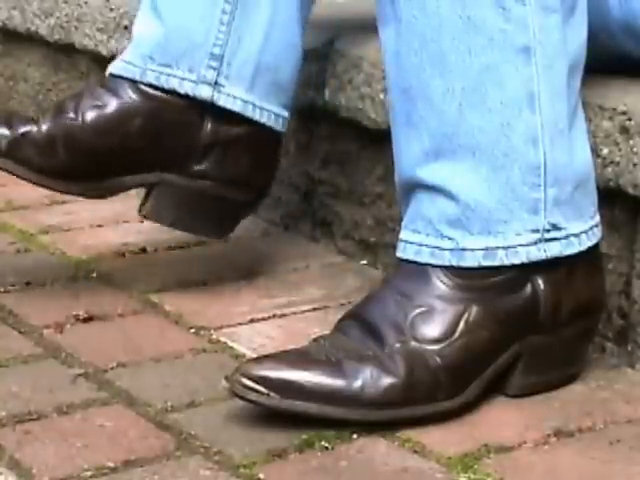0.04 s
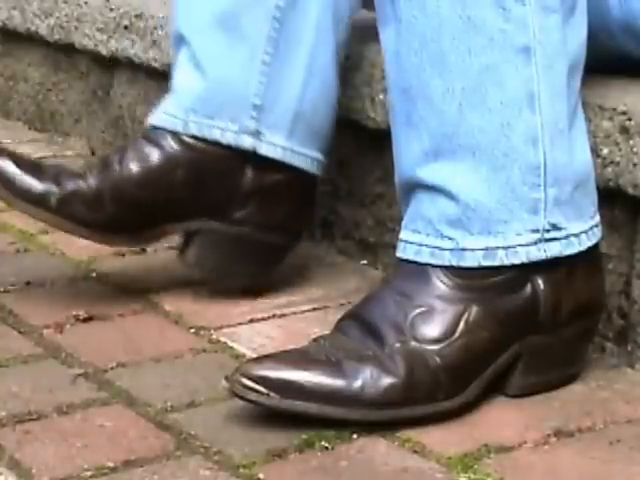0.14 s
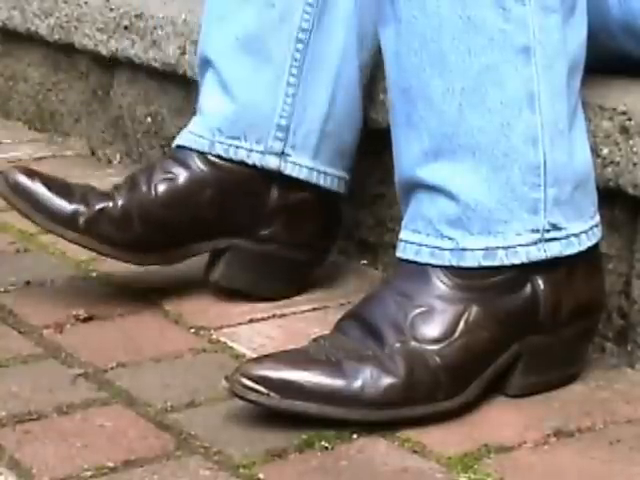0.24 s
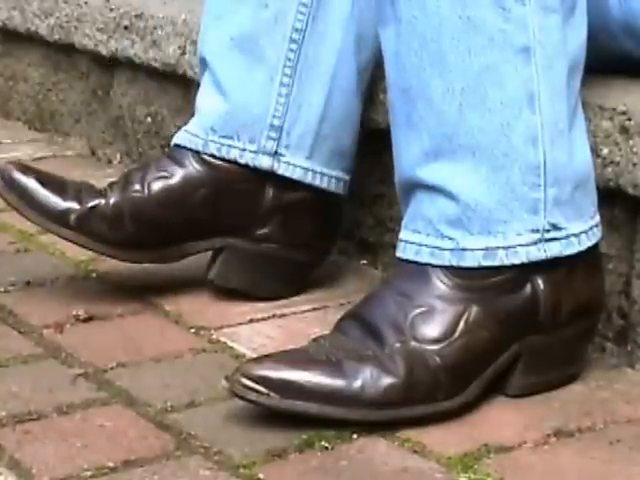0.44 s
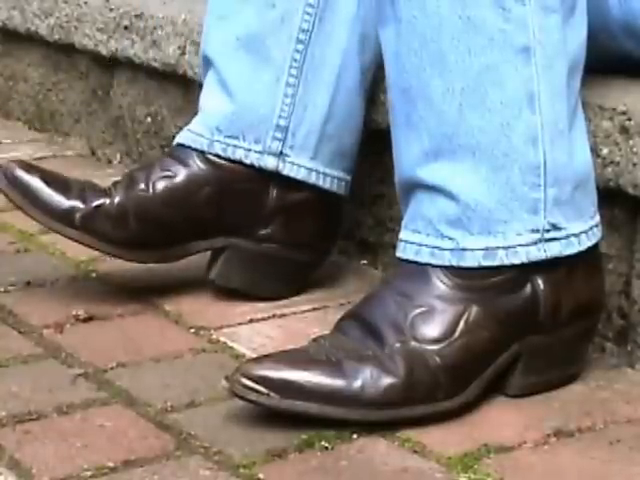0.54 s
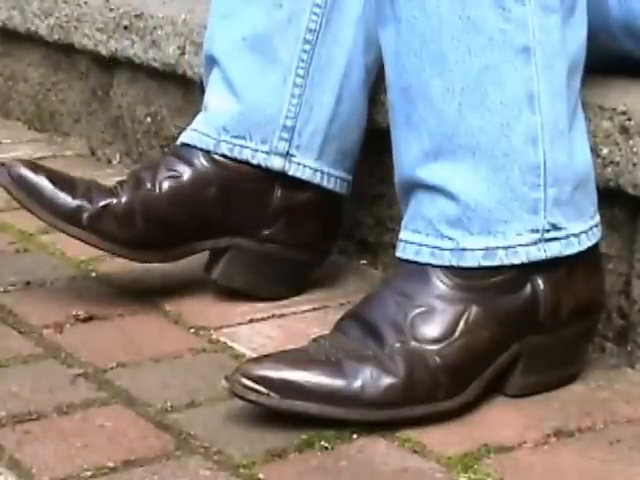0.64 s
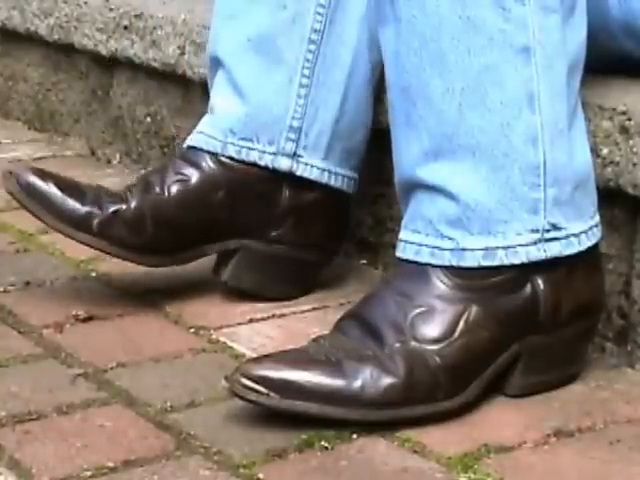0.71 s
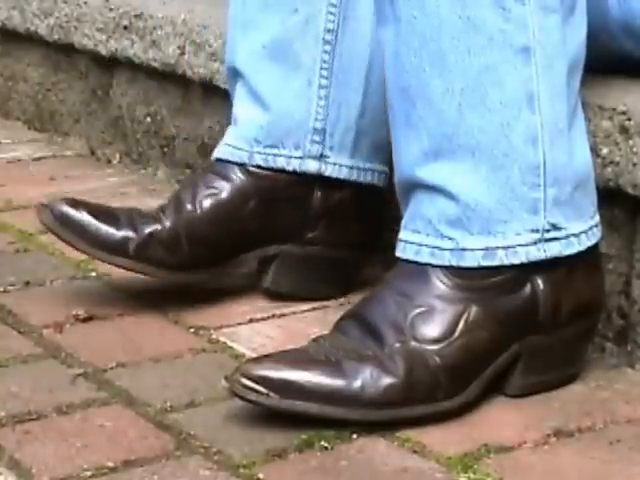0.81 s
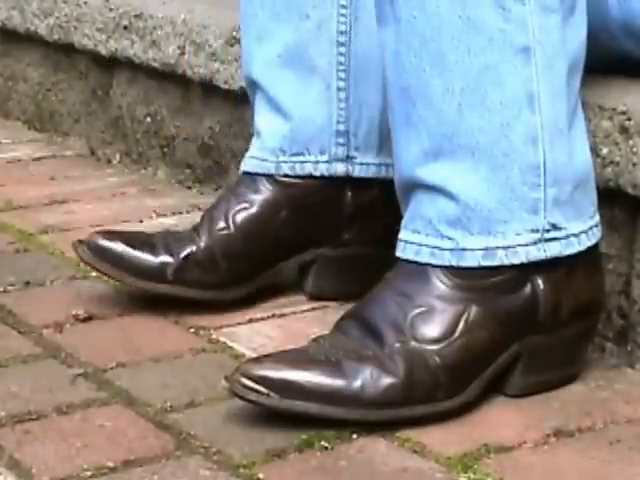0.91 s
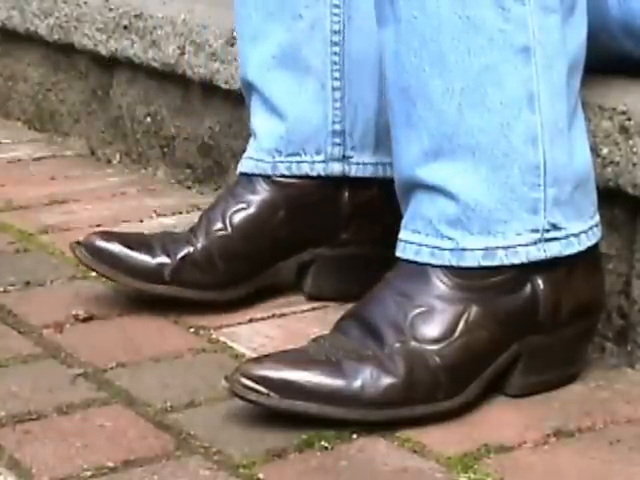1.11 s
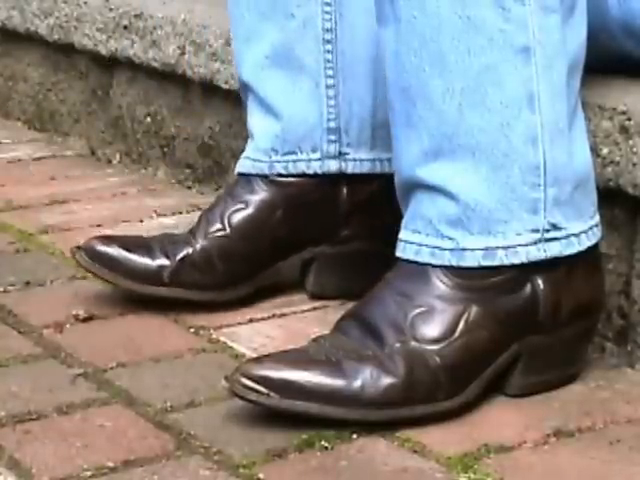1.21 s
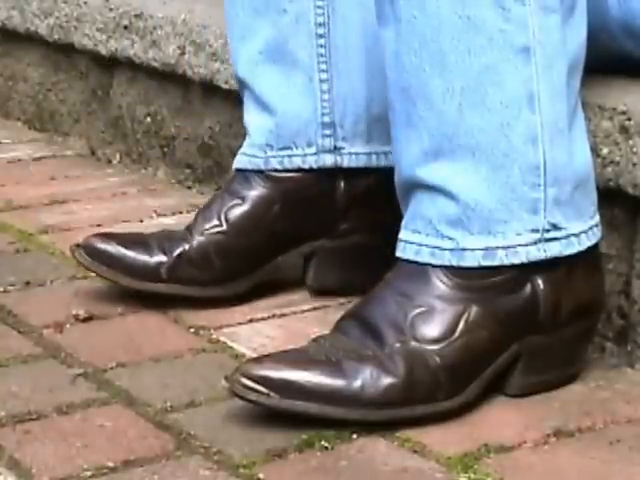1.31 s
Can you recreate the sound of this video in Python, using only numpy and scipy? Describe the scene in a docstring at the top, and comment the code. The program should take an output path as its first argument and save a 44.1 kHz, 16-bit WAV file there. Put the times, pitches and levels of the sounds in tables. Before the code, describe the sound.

A boot heel stomps once on brick paving, close to the microphone, with a brief echo off nearby walls. The sole then drags softly over grit and settles with faint bumps, against quiet outdoor background noise.

```python
"""A quiet outdoor wash and a low breeze run throughout.
At 0.2 s a boot heel stomps once on brick paving, close by; nearby walls throw the knock back.
A limiter ducks at the stomp and creeps back.
From 0.7 s the boot is dragged back: grit crackles and the sole judders.
From 1.1 s the foot settles in three soft bumps."""
import sys
import numpy as np
from scipy import signal
from scipy.fft import rfft, irfft, next_fast_len
from scipy.io import wavfile
from scipy.ndimage import uniform_filter1d, minimum_filter1d

SR = 44100
rng = np.random.default_rng(int(sys.argv[2]) if len(sys.argv) > 2 else 0)


def output_pcm(signal):
    """Save a mono or channel-first signal as 16-bit PCM at the path in sys.argv[1].

    Samples are clipped to [-1, 1] before scaling.
    """
    pcm = np.clip(np.atleast_2d(signal).T, -1, 1) * 32767
    wavfile.write(sys.argv[1], SR, np.round(pcm).astype(np.int16))


N = 59535
TIME_S = np.arange(N) / SR
FFT_SIZE = next_fast_len(2 * N)
FREQ_HZ = np.fft.rfftfreq(FFT_SIZE, 1 / SR)

# far and near sounds (frequency [Hz], L-R correlation [0-1])
FAR_COHERENCE = [(100, 0.94), (250, 0.87), (500, 0.57), (1000, 0.49), (2000, 0.46), (4000, .7),
                 (8000, 0.57), (14000, 1)]
NEAR_COHERENCE = [(100, 0.98), (250, .98), (600, 0.36), (2000, 0.9), (8000, 1), (14000, 0.99)]
# background noise (frequency [Hz], level [dB])
WASH_SPECTRUM = [(10, -30), (35, -6), (60, -1), (160, 0), (260, -3), (600, -3), (1400, -3.7), (2000, -7.5),
                 (3100, -10.7), (4400, -18.3), (5800, -22), (7000, -26.5), (10000, -30), (16000, -31)]
BREEZE_SPECTRUM = [(10, -35), (24, -19), (36, 4), (75, 0), (145, -2.5), (220, -20.5), (500, -35),
                   (3000, -79)]
# breeze strength (time [s], level [dB])
GUSTS = [(0, -38), (.15, -40), (.35, -35.5), (.62, -40.5), (.8, -36.5), (.95, -36.5), (1.04, -40),
         (1.11, -37.5), (1.21, -34), (1.27, -45), (1.35, -36)]

# boot bumps (time [s], thud level [dB], tick level [dB])
BUMPS = [(.733, -21.5, -60), (.761, -29, -60), (.882, -18.5, -60), (.928, -28.5, -48), (1.139, -28, -34),
         (1.205, -23, -50), (1.2745, -30.5, -20.5)]
# stick-slip of the sole (time [s], slip rate [Hz], level [dB])
JUDDER = [(0.782, 255, -35), (0.799, 290, -35), (0.817, 300, -29), (.84, 298, -31.5), (0.862, 230, -50)]
# dragged sole (time [s], rub level [dB], scrape level [dB], grit level [dB])
DRAG_LEVELS = [(.69, -68, -83, -61), (.74, -31, -46, -53.5), (.785, -50, -50, -47.5), (.82, -36, -41, -47),
               (.86, -28.5, -36, -38), (.91, -28, -34, -39.5), (.94, -29, -43, -53), (.98, -46, -64, -74)]
# single grains snapping (time [s], level [dB], T60 [s])
SNAPS = [(.368, -48, 0.082), (.702, -38, 0.014), (.7455, -48, .025), (.7585, -41, .008),
         (.7988, -32.5, .008), (.8097, -22.5, 0.0084), (.8195, -32.5, .012), (.826, -28.5, .016),
         (.8625, -33, .012), (.9045, -25.5, .016), (.912, -27.5, 0.0067)]
# grit crushed by the heel (delay [s], level [dB])
CRACKS = [(0, -30.5), (.0028, -36.5), (.0053, -33)]
# contact noises (frequency [Hz], level [dB])
TICK_SPECTRUM = [(300, 15), (2200, 0), (4200, -2.5), (5500, -18.5), (16000, -53)]
RUB_SPECTRUM = [(30, -30), (90, -3), (150, 2), (230, -3), (430, -7), (600, -16), (1200, -24.5), (3000, -55),
                (9000, -80)]
SCRAPE_SPECTRUM = [(300, -10), (700, 1.5), (1400, -12), (1630, 7.5), (1850, -7.5), (2500, -7), (3550, -1),
                   (4700, -14.5), (9000, -20), (16000, -47)]
GRIT_SPECTRUM = [(1500, -14), (4800, 0), (5600, 10.5), (6100, 0), (6500, 8), (7200, -2), (8300, 4.5),
                 (9200, 6.5), (10200, -2), (11000, -3), (12700, -9), (14000, -6), (16000, -5)]
SNAP_SPECTRUM = [(1500, -23), (4000, 2), (7000, -3), (8500, 4), (10200, -2.5), (12000, -6), (16000, -20)]
CRACK_SPECTRUM = [(500, -6), (2800, 5), (4000, -1), (5300, 1.5), (7000, -12.5), (11000, -11.5),
                  (16000, -23)]
# boot resonances (frequency [Hz], level [dB], T60 [s])
SOLE_MODES = [(110, -4, .05), (195, 0, .06), (397, -5, .035)]
HEEL_MODES = [(178.3, -3, 0.056), (409.4, 3.5, 0.019), (473, 10.5, 0.0054), (485, -11, 0.039),
              (1103, 1.97, 0.0064), (1857, -24.5, 0.03), (2800, -25, 0.013)]

# early reflections (delay [s], level [dB], L-R level [dB])
ECHOES = [(.0093, -14, 10), (0.0151, -16, 7), (.0325, -21, 5), (0.0476, -27, 15)]
# diffuse reverberation (frequency [Hz], level [dB], T60 [s])
TAIL_BANDS = [(30, -22, .3), (79, -5, 0.51), (160, 3, 0.16), (258, -3, 0.43), (500, -6, 0.31),
              (800, -1.5, 0.35), (1160, -17, 0.47), (1760, -33.5, 1), (4100, -42, 1), (9000, -64, 0.33)]
# microphone pair balance, and the heel's extra share (frequency [Hz], L-R level [dB])
MIC_BALANCE = [(40, 4), (120, 4), (200, 7), (380, 1), (700, 1), (1300, -1), (2400, -1.5), (4400, -0.8),
               (9000, 0)]
HEEL_BALANCE = [(150, 2), (400, .3), (1000, 0)]
# heel arrival at the pair (frequency [Hz], L-R phase [rad])
HEEL_PHASE = [(60, -0.28), (200, -0.69), (420, -.95), (800, -0.98), (1300, -0.58), (2300, -0.95), (3600, 0)]

STOMP_S = .2154


def amp(db):
    """Decibels to gain."""
    return 10 ** (np.asarray(db) / 20)


def unit_rms(x):
    """Scales to rms 1."""
    return x / np.sqrt(np.mean(x ** 2) + 1e-20)


def curve(table, hz=FREQ_HZ, column=1):
    """Interpolates a table over log frequency."""
    columns = np.transpose(table)
    return np.interp(np.log(hz + 1), np.log(columns[0] + 1), columns[column])


def envelope(table, column=1):
    """Gain over time from a dB table; silent outside it."""
    columns = np.transpose(table)
    return amp(np.interp(TIME_S, columns[0], columns[column], left=-np.inf, right=-np.inf))


def filtered(x, response):
    """Applies a frequency response."""
    return irfft(rfft(x, FFT_SIZE) * response, FFT_SIZE)[..., :N]


def pan(db):
    """Left and right gains for an L-R level."""
    return amp(np.array([np.atleast_1d(db), -np.atleast_1d(db)]) / 2)


def decay(start_s, t60_s):
    """Sudden onset, exponential fall."""
    return (TIME_S >= start_s) * np.exp(-np.log(1000) * np.maximum(TIME_S - start_s, 0) / t60_s)


def stereo(a, b, spectrum, coherence):
    """Two independent signals to a coloured, partly coherent pair, rms 1."""
    correlation = np.clip(curve(coherence), -1, 1)
    gain = amp(curve(spectrum))
    mid = filtered(a, gain * np.sqrt(1 + correlation))
    side = filtered(b, gain * np.sqrt(1 - correlation))
    return unit_rms(np.array([mid + side, mid - side]))


def noise(spectrum, coherence=NEAR_COHERENCE):
    """Coloured stereo noise, rms 1."""
    return stereo(*rng.standard_normal((2, N)), spectrum, coherence)


def drift(samples):
    """Smoothed noise, rms 1."""
    return unit_rms(uniform_filter1d(rng.standard_normal(N), size=samples))


def ring(modes, start_s, swell_cycles=.82):
    """Damped modes, each swelling as the contact builds."""
    age_s = np.maximum(TIME_S - start_s, 0)
    total = np.zeros(N)
    for hz, db, t60_s in modes:
        swell = 1 - np.exp(-age_s * hz / swell_cycles)
        total += amp(db) * decay(start_s, t60_s) * swell * np.sin(2 * np.pi * hz * age_s)
    return total


def wash(level_db=-36.5, patch_db=.68):
    """Distant outdoor noise with faint drifting patches."""
    bands = signal.stft(noise(WASH_SPECTRUM, FAR_COHERENCE), nperseg=512)[2]
    patches = uniform_filter1d(rng.standard_normal(bands.shape[1:]), size=8, axis=0)
    patches = unit_rms(uniform_filter1d(patches, size=8, axis=1))
    return amp(level_db) * signal.istft(bands * amp(patch_db * patches), nperseg=512)[1][:, :N]


def breeze():
    """Gusts rumble on the microphones."""
    return noise(BREEZE_SPECTRUM) * envelope(GUSTS)


def bumps(tick_t60_s=.012):
    """The boot catches on the paving and settles: soft thuds, each with a tick."""
    tick = noise(TICK_SPECTRUM)
    return sum(amp(thud_db) * ring(SOLE_MODES, start_s) + amp(tick_db) * tick * decay(start_s, tick_t60_s)
               for start_s, thud_db, tick_db in BUMPS)


def judder(rate_jitter=.041, overtone_db=-18):
    """The sole briefly sticks and slips at a nearly even rate."""
    times_s, rates_hz, _ = np.transpose(JUDDER)
    slip_hz = np.interp(TIME_S, times_s, rates_hz) * (1 + rate_jitter * drift(samples=200))
    phase = 2 * np.pi * np.cumsum(slip_hz) / SR
    return envelope(JUDDER, column=2) * unit_rms(np.sin(phase) + amp(overtone_db) * np.sin(2 * phase))


def grains(spectrum, clicks_per_s=3700, spread_db=4.5, clump_db=1):
    """Rolling grit: dense, uneven clicks in clumps."""
    clumps_db = clump_db * drift(samples=180)
    sizes = amp(spread_db * np.minimum(rng.exponential(1, (2, N)), 4) + clumps_db)
    clicks = sizes * rng.choice([-1, 1], (2, N)) * (rng.random(N) < clicks_per_s / SR)
    return stereo(*clicks, spectrum, NEAR_COHERENCE)


def scuff():
    """The sole rubs over brick and rolls grit; a few grains snap."""
    rub = noise(RUB_SPECTRUM) * envelope(DRAG_LEVELS)
    scrape = grains(SCRAPE_SPECTRUM) * envelope(DRAG_LEVELS, column=2)
    grit = grains(GRIT_SPECTRUM) * envelope(DRAG_LEVELS, column=3)
    snaps = noise(SNAP_SPECTRUM) * sum(amp(db) * decay(start_s, t60_s) for start_s, db, t60_s in SNAPS)
    return rub + scrape + grit + snaps


def wall_echoes(knock, cutoff_hz=1160):
    """Nearby walls return dull, delayed copies of the knock."""
    lowpass = 1 / (1 + (FREQ_HZ / cutoff_hz) ** 4)
    paths = sum(amp(db) * pan(side_db) * np.exp(-2j * np.pi * FREQ_HZ * delay_s)
                for delay_s, db, side_db in ECHOES)
    return filtered(knock, lowpass * paths)


def diffuse_tail(gain_db=-21.5, delay_s=.008, rise_s=.025):
    """The stomp's reverberation: noise that dies band by band."""
    hz, frames_s, bands = signal.stft(noise(TAIL_BANDS, FAR_COHERENCE), SR, nperseg=512)
    t60_s = curve(TAIL_BANDS, hz, column=2)[:, None]
    fall = amp(-60 * np.maximum(frames_s - STOMP_S, 0) / t60_s)
    rise = 1 - np.exp(-np.maximum(TIME_S - STOMP_S - delay_s, 0) / rise_s)
    return amp(gain_db) * rise * signal.istft(bands * fall, SR, nperseg=512)[1][:, :N]


def stomp(gain_db=7, low_cut_hz=81, crack_t60_s=.009):
    """The heel, too small to radiate deep bass, knocks on brick and crushes grit; the walls answer."""
    highpass = (1j * FREQ_HZ / (1j * FREQ_HZ + low_cut_hz)) ** 2
    knock = filtered(ring(HEEL_MODES, STOMP_S), highpass)
    phase_split = np.exp(.5j * np.array([[1], [-1]]) * curve(HEEL_PHASE))
    direct = filtered(knock, pan(curve(HEEL_BALANCE)) * phase_split)
    bursts = sum(amp(db) * decay(STOMP_S + delay_s, crack_t60_s) for delay_s, db in CRACKS)
    crack = noise(CRACK_SPECTRUM) * bursts
    return amp(gain_db) * (direct + crack + wall_echoes(knock) + diffuse_tail())


def scene():
    """All sources at a microphone pair with fuller bass on the left."""
    mix = stomp() + scuff() + judder() + bumps() + wash() + breeze()
    return filtered(mix, pan(curve(MIC_BALANCE)))


def reduction_db(excess_db, s_per_10_db):
    """Gain reduction: jumps to each excess, recovers at a steady rate."""
    recovery_db = 10 * TIME_S / s_per_10_db
    return np.maximum.accumulate(np.maximum(excess_db, 0) + recovery_db) - recovery_db


def record(dry, ceiling_db=-.36, lookahead_s=.03, threshold_db=-13, slope=.65, cutoff_hz=15800):
    """Slow-release look-ahead limiter, quicker compressor, low-pass."""
    peak = -minimum_filter1d(-abs(dry).max(0), 2 * int(lookahead_s * SR) + 1)
    duck_db = reduction_db(20 * np.log10(peak + 1e-9) - ceiling_db, s_per_10_db=3.95)
    limited = dry / amp(uniform_filter1d(duck_db, size=400))
    window = np.hanning(900)
    power_db = 10 * np.log10(signal.lfilter(window / window.sum(), 1, (limited ** 2).mean(0)) + 1e-12)
    compressed = limited / amp(reduction_db(slope * (power_db - threshold_db), s_per_10_db=.28))
    lowpass = signal.firwin(511, cutoff_hz, window=("kaiser", 9), fs=SR)
    return signal.oaconvolve(compressed, lowpass[None], "same")


dry = scene()
out = record(dry)
output_pcm(out)
```